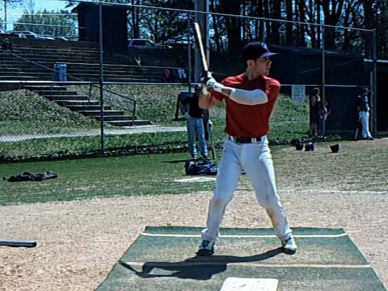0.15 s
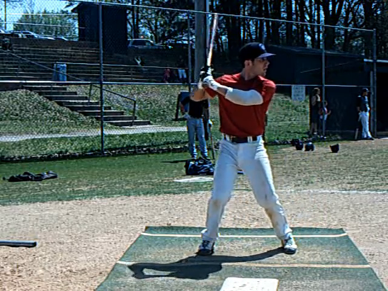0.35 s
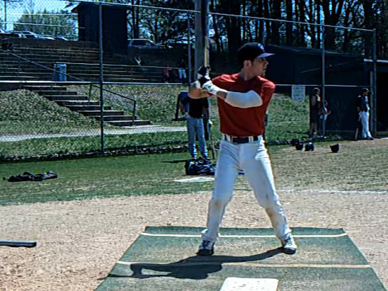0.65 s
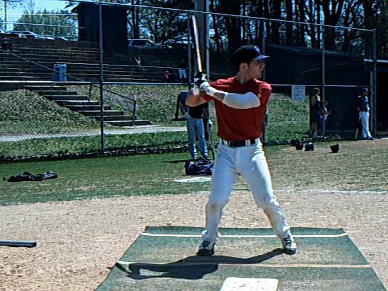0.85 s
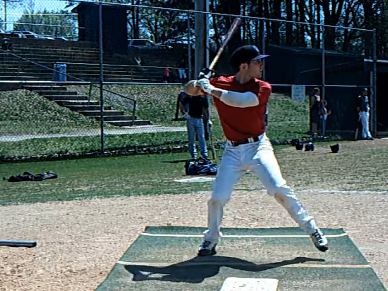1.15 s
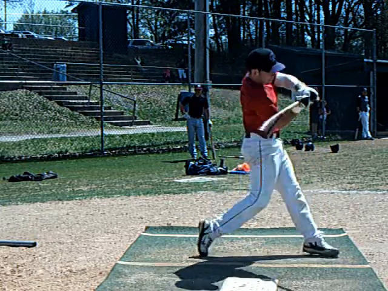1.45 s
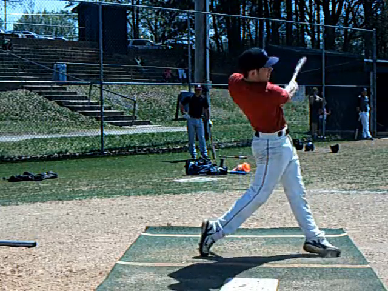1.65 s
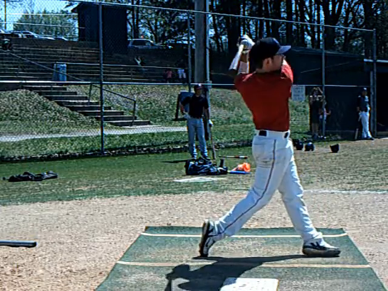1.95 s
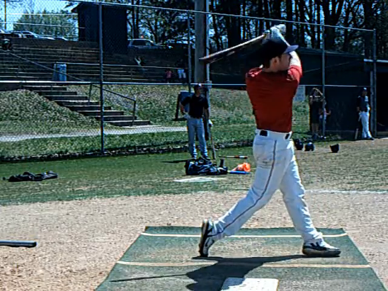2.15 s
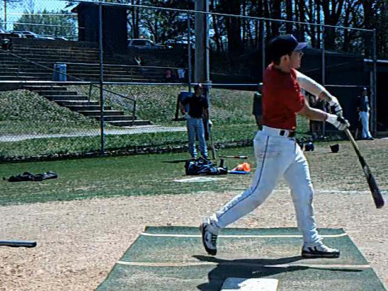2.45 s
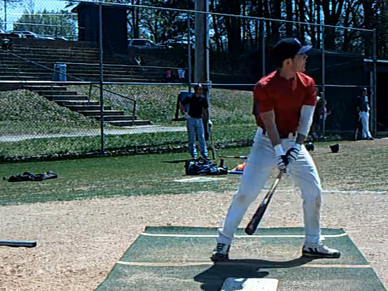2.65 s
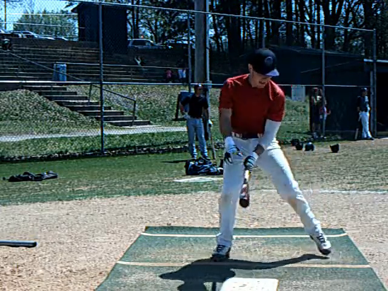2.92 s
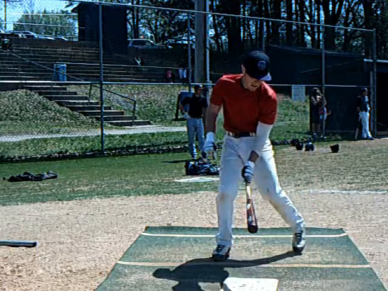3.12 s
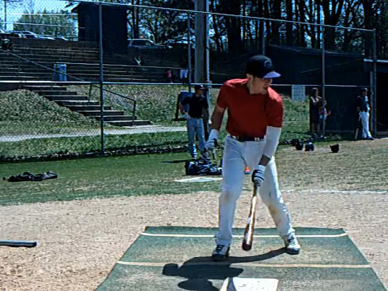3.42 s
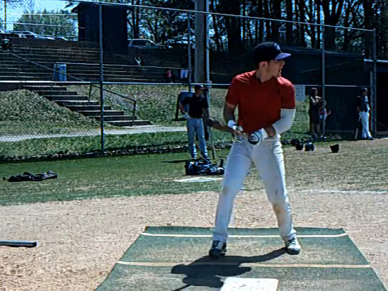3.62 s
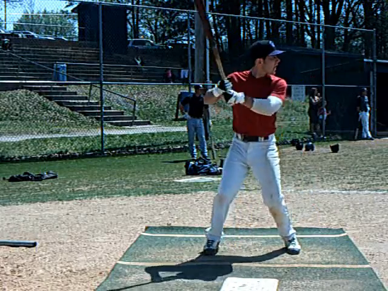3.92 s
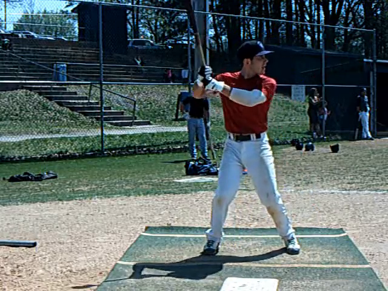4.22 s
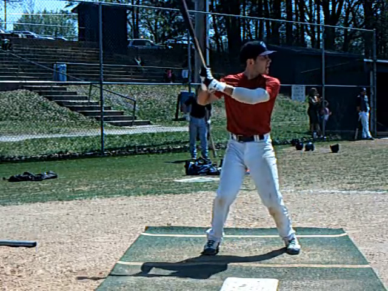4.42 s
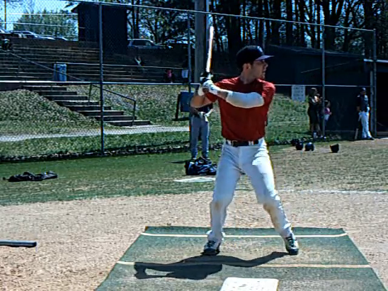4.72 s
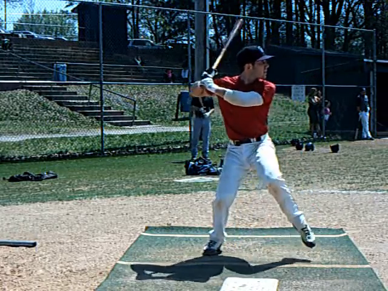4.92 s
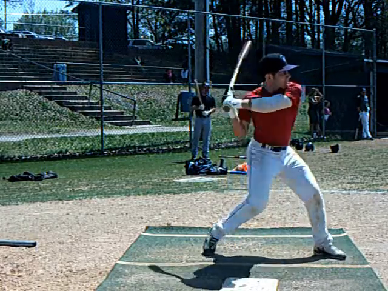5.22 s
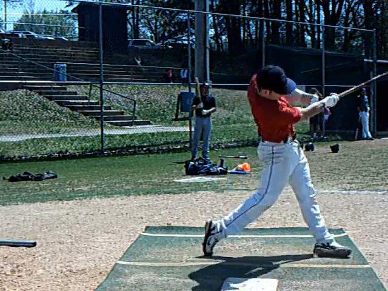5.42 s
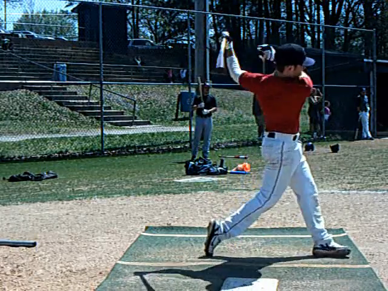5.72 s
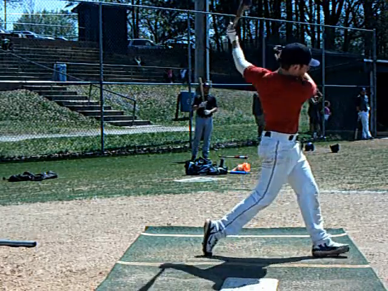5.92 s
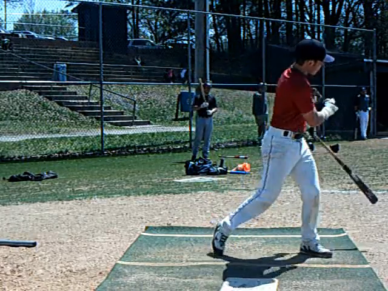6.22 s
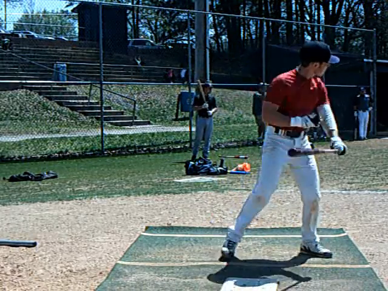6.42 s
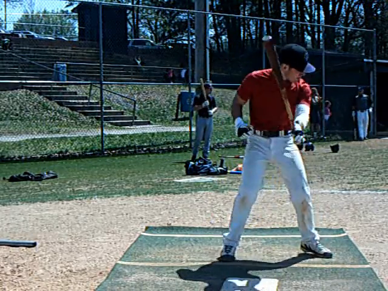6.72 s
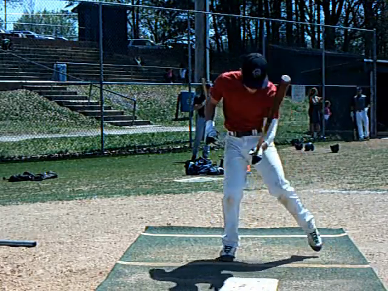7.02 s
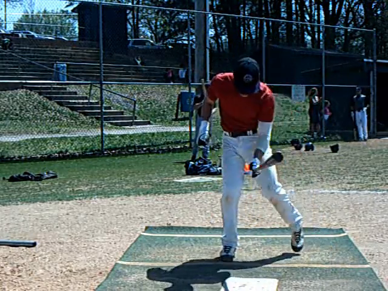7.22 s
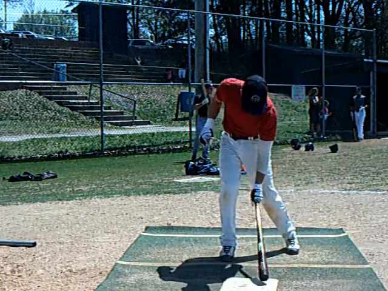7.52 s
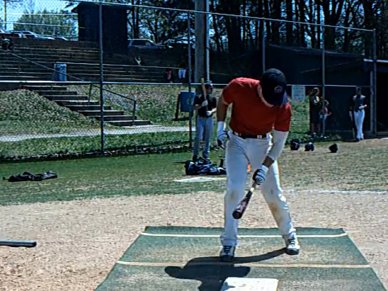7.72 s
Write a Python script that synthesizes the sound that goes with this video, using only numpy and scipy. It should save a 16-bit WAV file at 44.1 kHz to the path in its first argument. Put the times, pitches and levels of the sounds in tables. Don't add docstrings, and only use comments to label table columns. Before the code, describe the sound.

A rough, lo-fi small microphone picks up a distant jet overhead, its dull rumble swelling and thinning in turbulent air. Scattered far knocks tick quietly. One loud, short wooden bat hit bursts out early, with quick hard echoes; another, somewhat softer, comes in the later part. Wind thumps low on the microphone, strongest after five seconds, and weak birds whistle under a thin steady hiss.

```python
import sys
import numpy as np
from scipy import signal
from scipy.fft import rfft, irfft
from scipy.io import wavfile
from scipy.ndimage import uniform_filter1d

SR = 44100
rng = np.random.default_rng(int(sys.argv[2]) if len(sys.argv) > 2 else 0)


def generate_wav(signal):
    frames = np.transpose(np.atleast_2d(signal))
    scaled = np.clip(frames, -1, 1) * 32767
    pcm = np.round(scaled).astype(np.int16)
    wavfile.write(sys.argv[1], SR, pcm)


def volts_from_db(level):
    exponent = np.asarray(level, float) / 20
    return 10 ** exponent


N = 346442

# time [s], level [dB].
WIND_STRENGTH = [(0, -28), (.7, -25), (.95, -30), (1.3, -23), (1.7, -26.5), (2.6, -28), (3.4, -23),
                 (3.7, -27), (4.7, -29), (5.25, -19.5), (5.75, -23), (6.05, -25.5), (6.55, -18.5),
                 (7.0, -17), (7.55, -22.5), (7.86, -22)]


def in_time(rows):
    s, *columns = np.transpose(rows)
    return [np.interp(np.arange(N) / SR, s, column) for column in columns]


def rms_one(x):
    return x / np.sqrt(np.mean(x ** 2) + 1e-20)


def passband(x, low_hz, high_hz, order=2):
    sections = signal.butter(order, [low_hz, high_hz], "band", fs=SR, output="sos")
    return signal.sosfilt(sections, x)


def drift(rate):
    pole = np.exp(-80 * np.pi * rate / SR)
    white = rng.standard_normal(N // 40 + 2002)
    slow = signal.lfilter([1], [1, -2 * pole, pole * pole], white)[2000:]
    return np.interp(np.arange(N) / 40, np.arange(len(slow)), rms_one(slow))


def flicker(rate):
    quick = drift(rate)
    return rms_one(quick - uniform_filter1d(quick, size=SR // 6))


def ring(clicks, hz, t60):
    decay = volts_from_db(-60 / (t60 * SR))
    turn = 2 * np.pi * hz / SR
    return signal.lfilter([0, np.sin(turn)], [1, -2 * decay * np.cos(turn), decay * decay], clicks)


def coloured(spectrum):
    hz = np.fft.rfftfreq(N, 1 / SR)[1:]
    at, level_db = np.transpose(spectrum)
    shape = volts_from_db(np.interp(np.log(hz), np.log(at), level_db, left=-60, right=-90))
    return irfft(rfft(rng.standard_normal(N)) * np.r_[0, shape], N)


def blow_sound(click, modes, blow_db, crack_db):
    t = np.arange(len(click)) / SR
    wood = sum(volts_from_db(db) * ring(click, hz, t60) for hz, db, t60 in modes)
    crack = passband(rng.standard_normal(len(t)) * np.exp(-t / 0.00057), 2400, 6500)
    crack = volts_from_db(crack_db) * crack / np.abs(crack).max()
    return volts_from_db(blow_db) * passband(wood + crack, 480, 12000, order=1)


def field_echo(size, tail_low_hz, tail_db, tail_t60):
    # delay [s], level [dB], smear [s], lowest returned frequency [Hz].
    echo_paths = [(.0095, -15, 0.0039, 1210), (0.0395, -16, 0.006, 850), (.0665, -12, 0.0017, 980),
                  (0.0699, -14, 0.003, 850), (0.087, -30, .001, 1300), (.105, -28, 0.0013, 1100),
                  (0.128, -30, .002, 1500), (.0305, -15, .0012, 2300), (.0358, -15, .0012, 3000),
                  (0.056, -20, .0015, 1800), (0.0642, -6, 0.00006, 1150), (.1254, -19, .0006, 1000),
                  (.1594, -20, 0.0003, 950)]
    sharp_s = 0.0017
    t = np.arange(size) / SR
    scatter = rng.standard_normal(size) * volts_from_db(-60 * t / tail_t60) * (t > .008)
    walls = volts_from_db(tail_db) * passband(scatter, tail_low_hz, 10000)
    for delay, db, smear, low_hz in echo_paths:
        after = np.maximum(t - delay, 0)
        edge = 6 * np.exp(-smear / sharp_s) * (after < 1 / SR)
        patch = (rng.standard_normal(size) + edge) * np.exp(-after / max(smear, 5e-5)) * (t >= delay)
        patch = patch / np.sqrt(np.sum(patch ** 2))
        high_hz = 6200 * min(1, sharp_s / smear)
        walls = walls + volts_from_db(db - 0.5) * passband(patch, low_hz, high_hz, order=3)
    return walls + volts_from_db(3.5) * passband(walls, 1180, 1860, order=1)


def bat(tail_low_hz, tail_db, tail_t60):
    # start [s], blow [dB], crack [dB], echo [dB].
    hits = [
        (1.7951, 6.5, -2.5, -5),
        (5.6356, -0.5, -2.5, -6),
    ]
    # frequency [Hz], level [dB], t60 [s].
    bat_modes = [
        [(765, -2.5, 0.0094), (923, 2, 0.011), (1067, -1, 0.012), (1430, -2, 0.0048), (2300, -21, 0.014),
         (2685, -3.5, 0.0081), (4770, -5.5, 0.0069)],
        [(670, -18, 0.0067), (920, 2, 0.012), (1100, 3.5, 0.0045), (1260, -5.5, 0.007), (1540, -19, 0.0033),
         (3000, -0.5, 0.0053), (3680, -2, 0.0067)],
    ]
    # delay [s], level [dB].
    near_surfaces = [
        [(.0015, -3), (.0028, 3.5), (.0046, -5), (.0066, -4)],
        [(.0011, 3), (.0036, -15), (.0056, -5), (.0066, -15)],
    ]
    out, size = np.zeros(N), SR // 2
    click = (np.arange(size) == 0) * -1.0 + 1e-18
    for (s, blow_db, crack_db, echo_db), modes, bounces in zip(hits, bat_modes, near_surfaces):
        blow = blow_sound(click, modes, blow_db, crack_db)
        near = -click
        near[[round(delay * SR) for delay, db in bounces]] = volts_from_db([db for delay, db in bounces])
        walls = field_echo(size, tail_low_hz, tail_db, tail_t60)
        out[round(s * SR):][:size] += signal.fftconvolve(blow, near + volts_from_db(echo_db) * walls)[:size]
    return out


def ticks():
    # start [s], peak level [dB].
    knocks = [(0.827, -26), (2.121, -16), (2.8594, -19.5), (3.0415, -21), (3.5757, -24), (3.889, -19),
              (4.1026, -38), (4.153, -20), (4.2262, -23), (4.235, -19), (4.2372, -25), (4.3374, -21),
              (4.3904, -33), (4.71, -31), (4.892, -28), (4.9186, -20), (5.292, -25), (5.6304, -34),
              (6.1835, -21.5), (6.5533, -20), (6.7371, -26), (7.108, -21), (7.2916, -19), (7.5383, -44),
              (7.79, -25)]
    out, t = np.zeros(N), np.arange(1024) / SR
    ringing = volts_from_db(-60 * t / 0.011)
    for s, db in knocks:
        burst = rng.standard_normal(len(t)) + 6 * (t < .0001)
        knock = passband(burst * ringing, 1200, 6900)
        out[round(s * SR):][:len(t)] += volts_from_db(db - 3.0) * knock / np.abs(knock).max()
    return out


def carried():
    # time [s], level [dB], clarity as treble over bass [dB].
    air_path = [(0.0, -27, -3.5), (0.33, -28.5, 1.5), (0.96, -25.5, -0.5), (1.38, -28.5, -2.5),
                (1.6, -29.5, -2.5), (1.79, -31, 3), (2.23, -20, -1), (3.24, -22.5, -4.5), (3.46, -28.5, -2),
                (3.65, -24.5, 1.5), (3.83, -18.5, 3), (4.24, -24.5, 2), (4.46, -20.5, 2), (5.01, -25, -1),
                (5.51, -20.5, -1), (6.83, -24.5, -2), (7.39, -23, 0.5), (7.86, -22, -1)]
    # middle [s], half length [s], level [dB], clarity [dB].
    eddies = [(0.158, 0.14, 6, -2), (0.894, 0.32, -4.5, 1), (1.213, .15, 2.5, -1), (2.626, 0.043, 5, -2.5),
              (2.906, 0.15, 1, 3.5), (3.24, 0.22, 7.5, 1.5), (3.427, 0.092, 6, -1), (5.11, 0.12, -2, 1),
              (5.717, 0.14, 6.5, 1), (5.93, 0.2, -0.5, 0), (6.136, 0.15, 3, -2.5), (6.37, 0.14, 0, 0.5),
              (6.62, .12, 5.5, 4.5), (6.9, 0.17, 1.5, -1), (7.132, 0.049, 1.5, 4), (7.694, 0.19, 4.5, 2)]
    t = np.arange(N) / SR
    level_db, clarity_db = in_time(air_path)
    for s, half, db, clear_db in eddies:
        bump = np.exp(-2 * ((t - s) / half) ** 2)
        level_db = level_db + db * bump
        clarity_db = clarity_db + clear_db * bump
    return level_db, clarity_db


def roar(flicker_db):
    # frequency [Hz], level [dB per Hz].
    roar_spectrum = [(50, -5), (70, -1.5), (110, -0.5), (200, -1), (400, -3), (700, -5), (1100, -7),
                     (1500, -20), (1900, -30.5), (2300, -48.5)]
    # time [s], first notch [Hz], echo strength [0-1].
    ground_echo = [(0, 366, 0.59), (1.5, 316, 0.65), (2.7, 290, 0.7), (3.9, 265, 0.59), (5.1, 233, 0.71),
                   (6.3, 229, 0.55), (7.86, 225, 0.81)]
    # level over the carried level [dB], share of the carried swing [0-1],
    # share of clarity [ratio], share of the wind's swing [0-1].
    roar_parts = [
        (-1, 0.39, 0.0, 0.79),
        (-3.5, 0.85, -.6, 0),
        (-6.5, 0.97, .6, 0.0),
        (-16, 1, .4, 0.26),
    ]
    grass = [1.0, 0.83, 0.45, 0.11]
    spectrum, hz = rfft(coloured(roar_spectrum)), np.fft.rfftfreq(N, 1 / SR)
    above = [np.clip((hz - edge) / (edge / 3), 0, 1) for edge in (235, 680, 1120)]
    shares = -np.diff([1 + 0 * hz, *above, 0 * hz], axis=0)
    notch_hz, strength = in_time(ground_echo)
    (carried_db, clarity_db), (wind_db,) = carried(), in_time(WIND_STRENGTH)
    mean_db = carried_db.mean()
    now, out, together = np.arange(N), 0, flicker(5.3)
    for share, (part_db, swing, clear, windy), kept in zip(shares, roar_parts, grass):
        band = irfft(spectrum * share, N)
        bounced = np.interp(now - SR / (2 * notch_hz), now, band)
        band = band + kept * strength * bounced
        level_db = mean_db + part_db + swing * (carried_db - mean_db) + clear * clarity_db
        level_db = level_db + windy * (wind_db - wind_db.mean())
        level_db = level_db + flicker_db * (flicker(15.4) + .5 * together)
        out = out + volts_from_db(level_db) * rms_one(band)
    return out


def spells(rows):
    t = np.arange(N) / SR
    power = volts_from_db(-45.5) ** 2
    for s, half, db in rows:
        power = power + volts_from_db(db) ** 2 * np.exp(-3.0 * ((t - s) / half) ** 2)
    return np.sqrt(power)


def whines(whine_db, wobble_hz):
    # middle [s], half length [s], level [dB rms].
    high_spells = [(.6, 1, -35.5), (1.376, 0.35, -33), (2.186, .3, -26.5), (2.8, 0.83, -29),
                   (3.7, 0.37, -30.5), (4.43, .35, -27), (4.846, 0.77, -29.5), (5.267, 0.13, -20),
                   (5.705, .25, -25.5), (7.504, 0.27, -30)]
    # middle [s], half length [s], level [dB rms].
    low_spells = [(0.1, .25, -33.5), (1.3, .3, -36), (2.1, 0.17, -29), (3.0, 0.36, -23.5), (3.75, .2, -35),
                  (4.5, 0.33, -39.5), (5.5, 0.52, -34), (6.8, .4, -39), (7.6, .2, -29)]
    t = np.arange(N) / SR
    pitch_hz = 496 * (1 - .0305 * t + .00108 * t ** 2)
    out = 0
    for ratio, rows in ((1, high_spells), (.871, low_spells)):
        turns = np.cumsum(ratio * pitch_hz + wobble_hz * drift(6.25)) / SR
        level = np.sqrt(2) * spells(rows) * volts_from_db(whine_db + 1.7 * drift(9.1))
        out = out + level * np.sin(2 * np.pi * turns)
    return out


def wind():
    # start [s], length [s], level [dB rms], top frequency [Hz].
    puffs = [
        (0.659, 0.053, -21, 141),
        (5.185, 0.12, -15, 181),
        (5.442, 0.055, -19.5, 150),
        (6.576, 0.046, -15, 170),
        (7.168, .05, -17, 150),
        (7.39, 0.081, -26, 97),
    ]
    level_db = in_time(WIND_STRENGTH)[0] - 7 + 1.4 * flicker(18)
    out = volts_from_db(level_db) * rms_one(passband(rng.standard_normal(N), 20, 60))
    for s, length, db, top_hz in puffs:
        size = round(length * SR)
        puff = rms_one(passband(rng.standard_normal(8192), 51, top_hz)[-size:])
        out[round(s * SR):][:size] += volts_from_db(db) * signal.windows.tukey(size, .6) * puff
    return out


def whistles(calls, blur):
    out = np.zeros(N)
    wander = (drift(110) + 1j * drift(110)) / np.sqrt(2)
    for s, length, start_hz, end_hz, db in calls:
        at, size = round(s * SR), round(length * SR)
        turns = np.cumsum(np.linspace(start_hz, end_hz, size)) / SR
        smear = 1 - blur + blur * wander[at:at + size]
        note = np.real(smear * np.exp(2j * np.pi * turns))
        out[at:at + size] += volts_from_db(db + 11.5) * signal.windows.tukey(size, .4) * note
    return out


def birds():
    # start [s], length [s], start pitch [Hz], end pitch [Hz], level [dB rms].
    near_calls = [
        (0.37, 0.063, 3930, 4170, -56),
        (0.687, .062, 4000, 4060, -59),
        (.86, 0.18, 3480, 3560, -67),
        (2.23, 0.05, 4860, 4780, -54),
    ]
    # start [s], length [s], start pitch [Hz], end pitch [Hz], level [dB rms].
    far_calls = [
        (.305, .045, 5340, 5480, -61),
        (2.52, 0.083, 2600, 2500, -59),
        (3.645, 0.12, 4180, 4100, -59),
        (3.73, 0.093, 1560, 1596, -41),
        (5.89, .05, 2500, 2450, -54),
        (6.046, 0.12, 2320, 2430, -61),
    ]
    return whistles(near_calls, blur=0.15) + whistles(far_calls, blur=1)


def hiss():
    # frequency [Hz], level [dB per Hz].
    hiss_spectrum = [(1180, -19), (2000, -7), (2590, 0.5), (3320, -18.5), (3460, -6), (4000, -2),
                     (5400, -2), (7020, -89), (11900, -120)]
    return volts_from_db(-52.5) * rms_one(coloured(hiss_spectrum))


def scene():
    play = bat(tail_low_hz=1070, tail_db=-47.0, tail_t60=0.68) + ticks()
    jet = roar(flicker_db=0.62) + whines(whine_db=-2.0, wobble_hz=1.0)
    return (play + jet + wind() + birds() + hiss())[None]


def roll_off(x):
    return signal.sosfilt(signal.butter(12, 15890, fs=SR, output="sos"), x)


def record(dry):
    camera_hz = 11026.36
    smooth = signal.sosfilt(signal.butter(2, 6000, fs=SR, output="sos"), dry[0])
    taken = np.arange(0, N, SR / camera_hz)
    slow = np.clip(np.interp(taken, np.arange(N), smooth), -.99, .99)
    slope = signal.lfilter([.1], [1, -.9], np.abs(np.diff(slow, prepend=0)))
    step_noise = volts_from_db(-16.5) * slope * rng.standard_normal(len(slow))
    slow = np.clip(slow + step_noise, -1, 1)
    held = slow[(np.arange(N) * camera_hz / SR).astype(int)]
    return roll_off(held[None])


dry = scene()
out = record(dry)
generate_wav(out)
```